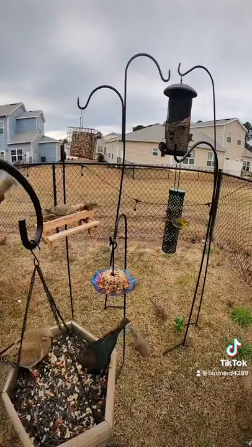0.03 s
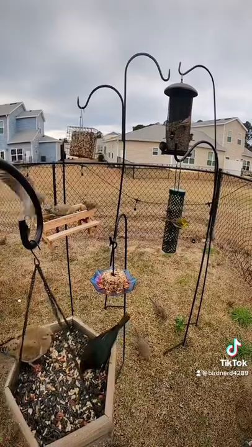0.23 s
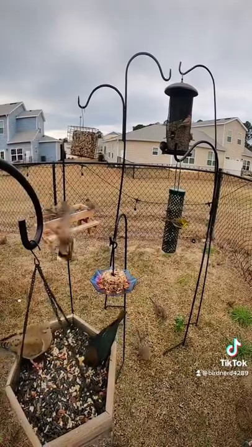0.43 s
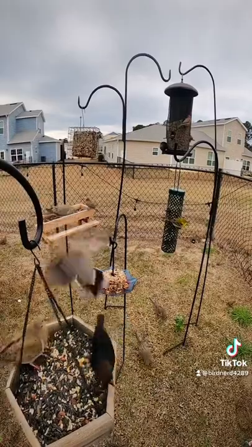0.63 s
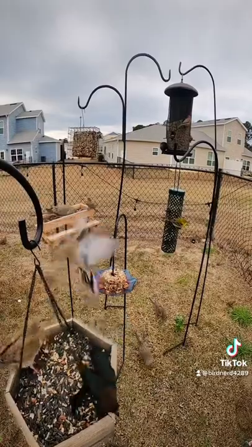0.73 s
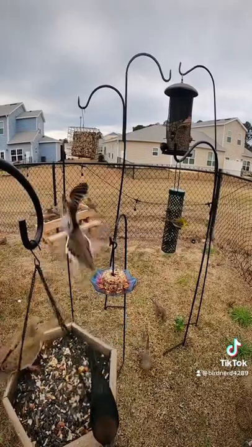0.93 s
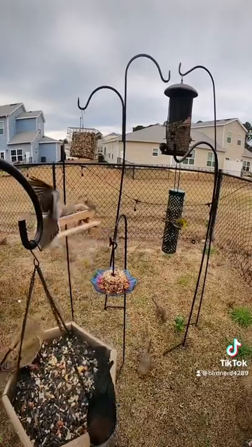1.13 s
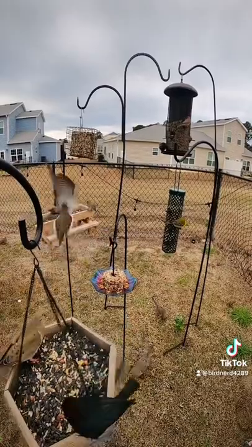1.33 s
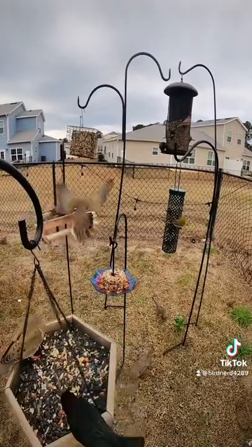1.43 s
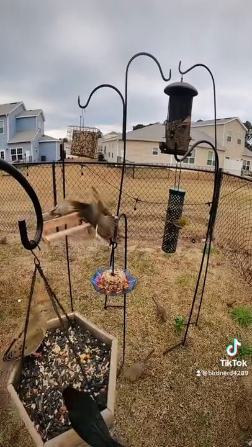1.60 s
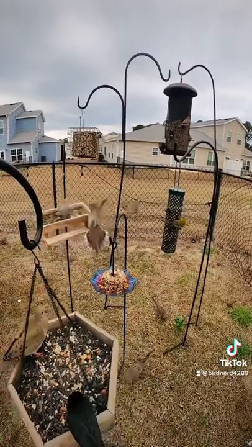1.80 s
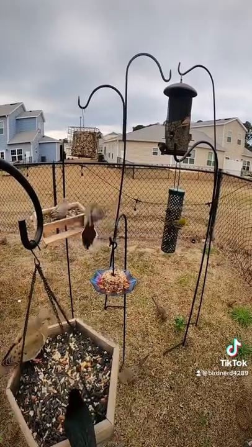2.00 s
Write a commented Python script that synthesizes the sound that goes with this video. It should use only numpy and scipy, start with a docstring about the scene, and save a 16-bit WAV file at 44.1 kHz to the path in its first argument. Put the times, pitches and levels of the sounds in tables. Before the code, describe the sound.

Close, dry, nearly mono wing flapping in a quiet garden: whistling wingbeats in bursts, strongest before the middle, then snapping wing tips, soft feather brushes, a bump, beak and claw ticks, and a faint chirp at either end.

```python
"""A garden feeder, close by, with doves fluttering round it in quiet outdoor air.
Each wingbeat whistles as gliding tones, swishes as shaped noise and pushes a puff of air as a pressure pulse;
then the wing tips clap three times and brush softly as a bird brakes to land, with hollow thumps.
Beaks and feet tick on the seed trays, which ring as resonant noise, and a small bird chirps twice."""
import sys
import numpy as np
from scipy import signal
from scipy.fft import rfft, irfft
from scipy.io import wavfile

SR = 44100
rng = np.random.default_rng(int(sys.argv[2]) if len(sys.argv) > 2 else 0)


def unload_audio(sound):
    """Save the sound as a 16-bit wav file, at the path given as the first command line argument."""
    columns = np.transpose(np.atleast_2d(sound))
    # keep every value between -1 and 1, then stretch to whole-number steps
    steps = np.round(np.clip(columns, -1, 1) * 32767)
    wavfile.write(sys.argv[1], SR, steps.astype(np.int16))


N = 90581
T = np.arange(N) / SR


def undb(db):
    """Level law: decibels to amplitude gain."""
    return 10 ** (np.asarray(db) / 20)


def unit(x):
    """Normalisation to an rms of 1."""
    return x / np.sqrt(np.mean(x ** 2))


def colour(x, points):
    """Linear filtering: gains from (frequency [Hz], gain [dB]) points, joined over log frequency."""
    hz, db = np.array(points).T
    f = np.maximum(np.fft.rfftfreq(N, 1 / SR), 1)
    gain = undb(np.interp(np.log(f), np.log(hz), db))
    return irfft(rfft(x) * gain, N)


def noise(points):
    """Broadband turbulence: random noise of rms 1 with the given spectrum."""
    return unit(colour(rng.standard_normal(N), points))


def band(hz, width_hz):
    """Resonance: noise of rms 1, width_hz wide at half amplitude; at 0 Hz, a random wander."""
    f = np.fft.rfftfreq(N, 1 / SR)
    response = 1 / (1 + (2 * (f - hz) / width_hz) ** 2)
    return unit(irfft(rfft(rng.standard_normal(N)) * response, N))


def swell(at, rise, fall):
    """Gaussian envelope: a rounded rise and fall about a moment."""
    return np.exp(-((T - at) / np.where(T < at, rise, fall)) ** 2)


def strike(at, rise, fall):
    """Exponential envelope: a pointed rise and decay about a moment."""
    return np.exp(-abs(T - at) / np.where(T < at, rise, fall))


def scatter(x, decay_s):
    """Diffuse reflection: convolution with a decaying noise tail of unit energy."""
    tail = rng.standard_normal(N) * np.exp(-T / decay_s)
    return signal.fftconvolve(x, tail / np.linalg.norm(tail))[:N]


# spectrum of the outdoor air: (frequency [Hz], relative density [dB])
AIR_SPECTRUM = [(130, 2), (450, -28), (1000, -22.5), (7000, -64.5), (9000, -33.5), (16000, -59)]


def outdoor_air():
    """Stationary noise: quiet air with most of its power in the bass."""
    return undb(-53) * noise(AIR_SPECTRUM)


# small bird's chirps: (peak time [s], rise [s], fall [s], top pitch before the voice ratio [Hz], level [dB])
CHIRPS = [(0.112, 0.01, 0.0038, 8030, -58.5), (1.967, 0.022, .025, 4540, -54)]
# two voices of a chirp: (pitch ratio [1], added level [dB])
CHIRP_VOICES = [(1.002, 3), (1.248, 1)]
# softening of the highest treble: (frequency [Hz], gain [dB])
CHIRP_TREBLE = [(8000, 0), (14000, -30)]
CHIRP_DROP, CHIRP_PEAK_S = .25, .0075  # share of pitch lost on the flanks; time scale of the peak
CHIRP_WAVER, CHIRP_OCTAVE_DB = .03, -9  # rms share of the pitch; octave against its fundamental


def chirps():
    """Frequency modulation: two voices with octaves flick up to a pointed peak and settle again."""
    out = 0
    for at, rise, fall, hz, db in CHIRPS:
        away = abs(T - at) / np.where(T < at, rise, fall)
        envelope = np.exp(-away ** 4)
        pitch = hz * (1 - CHIRP_DROP * (1 - np.exp(-abs(T - at) / CHIRP_PEAK_S)))
        for ratio, voice_db in CHIRP_VOICES:
            wavering = ratio * pitch * (1 + CHIRP_WAVER * band(0, 900))
            phase = 2 * np.pi * np.cumsum(wavering) / SR
            tone = np.sin(phase) + undb(CHIRP_OCTAVE_DB) * np.sin(2 * phase)
            out = out + undb(db + voice_db) * envelope * tone
    return colour(out, CHIRP_TREBLE)


# pecks and claws on the trays: (time [s], tick level [dB], ring level [dB])
PECKS = [(1.662, -57, -53.5), (1.713, -67, -50), (1.756, -45, -56), (1.764, -39, -61), (1.797, -46, -59),
         (1.843, -55, -66.5), (1.89, -52, -71), (1.996, -49, -50.5)]
# modes of the tray: (frequency [Hz], level against the ring [dB], decay by 60 dB [s])
TRAY_MODES = [(2530, -2, 0.056), (3770, -0.5, 0.06), (4070, 3.5, 0.036), (5750, 0.5, 0.026),
              (8830, -3, 0.018)]
# spectrum of a tick, also of a feather flick: (frequency [Hz], relative density [dB])
TICK_SPECTRUM = [(800, -10), (9500, 14), (16000, -14)]
TICK_S, RING_SCATTER = 0.0035, .045  # tick decay; half-width of a mode as a share of its frequency


def trays():
    """Impact excitation: sharp pecks rattle the seed and ring the damped modes of the tray."""
    out, tick = 0, noise(TICK_SPECTRUM)
    rings = [undb(db) * band(hz, 2 * RING_SCATTER * hz) for hz, db, _ in TRAY_MODES]
    for at, tick_db, ring_db in PECKS:
        out = out + undb(tick_db) * strike(at, 0.0004, TICK_S) * tick
        for ring, (_, _, t60) in zip(rings, TRAY_MODES):
            out = out + undb(ring_db) * ring * strike(at, 0.00064, t60 / np.log(1000))
    return out


# hollow thumps of the landing: (onset time [s], level [dB])
BUMPS = [(1.565, -43), (1.632, -31), (1.715, -50.5)]
BUMP_START_HZ, BUMP_END_HZ, BUMP_DROP_S = 1150, 200, .0024
BUMP_RISE_S, BUMP_FALL_S = .0018, .0045


def bumps():
    """Falling-frequency oscillation: hollow thumps whose pitch drops as they die away."""
    out = 0
    for at, db in BUMPS:
        age = np.maximum(T - at, 0)
        pitch = BUMP_END_HZ + (BUMP_START_HZ - BUMP_END_HZ) * np.exp(-age / BUMP_DROP_S)
        phase = 2 * np.pi * np.cumsum(pitch * (T > at)) / SR  # silent before the onset
        out = out + undb(db) * strike(at + BUMP_RISE_S, BUMP_RISE_S, BUMP_FALL_S) * np.sin(phase)
    return out


# puffs of air: (time [s], level [dB])
PUFFS = [(0.107, -28.5), (0.149, -29.5), (0.189, -31), (0.396, -39.5), (0.437, -38.5), (0.481, -31.5),
         (0.563, -25.5), (.652, -27), (0.729, -25.5), (0.775, -25.5), (0.852, -27.5), (0.988, -33.5),
         (1.094, -33), (1.202, -31), (1.549, -41), (1.625, -31.5), (1.698, -33)]
# spectrum of the eddies: (frequency [Hz], relative density [dB])
EDDY_SPECTRUM = [(15, -5), (40, 1), (75, -4.5), (170, -18.5), (2000, -124.5)]
# stirred air and rustle: (time [s], level of the bass [dB], level of the rustle [dB])
STIR = [(0, -41.5, -60), (.19, -42.5, -55.5), (.29, -40.5, -59), (.35, -73, -69), (0.38, -39, -51.5),
        (.69, -41.5, -60.5), (0.747, -27.5, -46), (.91, -39, -51.5), (1.03, -44, -61.5),
        (1.258, -43.5, -63.5), (1.40, -40, -55), (1.56, -36, -49), (1.72, -41, -51.5), (1.81, -51.5, -63),
        (2.05, -49, -60.5)]
# low rings of the feeder pole and tray: (frequency [Hz], width [Hz], level against the stirred air [dB])
POLE_RINGS = [(136.8, 12, -14), (247.4, 28, -22)]
PUFF_S, EDDY_S, EDDY_DB = 0.00536, 0.016, -6  # EDDY_DB is against the puff


def downwash():
    """Pressure pulse and turbulence: a dip between two pushes, with eddies; stirred air rings the feeder."""
    push, eddies = 0, 0
    for at, db in PUFFS:
        x = (T - at) / PUFF_S
        push = push + undb(db) * np.sqrt(2) * (x ** 2 - 1) * np.exp(-.5 * x ** 2)
        eddies = eddies + undb(db + EDDY_DB) * swell(at, EDDY_S, EDDY_S)
    at, bass_db, _ = np.array(STIR).T
    stir = undb(np.interp(T, at, bass_db))
    turbulence = np.hypot(eddies, stir) * noise(EDDY_SPECTRUM)  # the two add in power
    rings = stir * sum(undb(db) * band(hz, width) for hz, width, db in POLE_RINGS)
    return push + turbulence + rings


# spectrum of the plumage: (frequency [Hz], relative density [dB])
RUSTLE_SPECTRUM = [(250, 16), (600, 6), (1600, 6.5), (7000, -8), (9000, -8), (16000, -24)]
# feathers brushing and flicking: (time [s], level [dB], decay [s])
BRUSHES = [(0.078, -44, 0.0045), (0.74, -38.5, 0.0019), (0.751, -39.5, 0.0038), (.774, -36.5, 0.0012),
           (0.848, -44.5, 0.0037), (1.374, -39.5, 0.0035), (1.607, -39.5, 0.0058), (1.681, -43, 0.011),
           (1.713, -52.5, 0.032)]
# bright flicks of feather tips: (time [s], level [dB])
FLICKS = [(0.363, -51.5), (0.788, -49), (0.815, -43.5), (0.89, -48.5), (0.941, -45.5)]
# spectrum of a brush and of the wing tips' crack: (frequency [Hz], relative density [dB])
CRACK_SPECTRUM = [(400, -6.5), (1750, 5), (2900, -3), (5000, -4.5), (7500, -14.5), (9000, -8.5),
                  (12500, -17.5), (16000, -45)]
GRAIN_DB, GRAIN_HZ = 3.5, 213  # rms and rate of the rustle's roughness
FEATHER_RISE_S, FLICK_S = 0.00092, 0.0035


def feathers():
    """Friction noise: a grainy rustle of the plumage, with single brushes and bright flicks."""
    at, _, rustle_db = np.array(STIR).T
    grain_db = GRAIN_DB * band(0, 2 * GRAIN_HZ)
    rustle = undb(np.interp(T, at, rustle_db) + grain_db) * noise(RUSTLE_SPECTRUM)
    brushes = sum(undb(db) * strike(s, FEATHER_RISE_S, fall) for s, db, fall in BRUSHES)
    flicks = sum(undb(db) * strike(s, FEATHER_RISE_S, FLICK_S) for s, db in FLICKS)
    return rustle + brushes * noise(CRACK_SPECTRUM) + flicks * noise(TICK_SPECTRUM)


# wing-tip claps: (time [s], level of the crack [dB], level of the slap [dB])
CLAPS = [(1.381, -27.5, -38), (1.462, -29, -41), (1.5316, -21.5, -31.5)]
# spectrum of the slap: (frequency [Hz], relative density [dB])
SLAP_SPECTRUM = [(200, 4.5), (1800, 6), (9500, -11), (16000, -19)]
CRACK_RISE_S, CRACK_FALL_S = 0.0016, 0.0012
SLAP_LAG_S, SLAP_RISE_S, SLAP_FALL_S = 0.0053, 0.00097, 0.0039


def claps():
    """Impulsive noise: the wing tips meet with a crack and the vanes slap just after."""
    crack = sum(undb(db) * strike(at, CRACK_RISE_S, CRACK_FALL_S) for at, db, _ in CLAPS)
    slap = sum(undb(db) * strike(at + SLAP_LAG_S, SLAP_RISE_S, SLAP_FALL_S) for at, _, db in CLAPS)
    return crack * noise(CRACK_SPECTRUM) + slap * noise(SLAP_SPECTRUM)


# wingbeats: (middle time [s], whistle pitch [Hz], whistle level [dB], time scale of the fall [s], glide [Hz/s])
BEATS = [(.009, 2415, -39, 0.0095, -5000), (.089, 2607, -41.5, 0.0099, -2000),
         (0.161, 2520, -48, 0.0059, -7000), (0.249, 2320, -47, 0.0081, 7005),
         (0.38, 2504, -41, 0.0089, 11025), (0.462, 2535, -40.5, 0.0097, 2010),
         (0.549, 2257, -44.5, 0.0055, 4005), (0.638, 1850, -51, 0.01, -2000),
         (0.712, 3067, -36.5, 0.002, -9000), (.726, 2700, -34.5, 0.007, 3004),
         (0.795, 2647, -30.5, 0.0043, -3000), (0.826, 1523, -43.5, 0.0038, -12000),
         (0.86, 2560, -42, 0.0021, -30000), (0.88, 2387, -43, 0.0074, -6000),
         (0.969, 2404, -44, 0.013, 4001.5), (1.077, 2398, -44.5, 0.0086, 2991),
         (1.188, 2482, -41, 0.0082, 6990.5), (1.286, 2466, -41.5, 0.0053, -15000),
         (1.354, 2170, -46.5, 0.0054, 8000)]
# spectrum of the swish: (frequency [Hz], relative density [dB])
SWISH_SPECTRUM = [(700, -5.5), (1400, 8.5), (2200, 3.5), (3200, 4), (7000, -9), (9000, -2), (16000, -26)]
SWISH_LAG_S, SWISH_RISE_S, SWISH_FALL_S = 0.0017, 0.029, 0.041
SWISH_DB, SWISH_SHARE = -46, 0.29  # the swish grows by this share of the whistle's level in dB


def swishes():
    """Aerodynamic noise: air rushes over the wing on each beat, and overlapping beats add in power."""
    power = 0
    for at, _, db, _, _ in BEATS:
        envelope = swell(at + SWISH_LAG_S, SWISH_RISE_S, SWISH_FALL_S)
        power = power + (undb(SWISH_DB + SWISH_SHARE * db) * envelope) ** 2
    roughness = undb(3.94 * band(0, 280))
    return np.sqrt(power) * noise(SWISH_SPECTRUM) * roughness


# feathers that sing on each stroke: (pitch ratio [1], level to be divided by the slack [dB], lag [s])
VANES = [(1, 0, 0), (1.1, -4.5, .002), (.86, -5, .009), (.62, -7, -.006)]
# soft strokes hold their note less firmly: (whistle level [dB], slack from 0 to 1 [1])
SLACK = [(-54, .9), (-46, .45), (-33, .4)]
OCTAVE_DB, TWELFTH_DB = -15.5, -26  # overtones against the fundamental
ARCH_HZ, ARCH_S = 420, .02  # the arch lowers the pitch by ARCH_HZ at ARCH_S before and after mid-stroke
WAVER, WAVER_HZ, BREATH_HZ = .018, 230, 340  # rms share of the pitch, its rate, width of the airy edge
WHISTLE_SHAPE, WHISTLE_LEAD = 1.7, 1.25  # roundness of the swell; length of its rise against its fall


def whistles():
    """Aeolian tone: feathers sing in a tilted arch, clear on hard strokes, in breathy strands on soft ones."""
    out, airflow = 0, []
    for _ in VANES:
        waver = 1 + WAVER * band(0, 2 * WAVER_HZ)
        eddy = (band(0, BREATH_HZ) + 1j * band(0, BREATH_HZ)) / np.sqrt(2)
        airflow.append((waver, eddy))
    for at, hz, db, fall, glide in BEATS:
        age = np.clip(T - at, -2 * ARCH_S, 2 * ARCH_S)
        pitch = hz + glide * age - ARCH_HZ * (age / ARCH_S) ** 2
        slack = np.interp(db, *zip(*SLACK))
        for (waver, eddy), (ratio, vane_db, lag) in zip(airflow, VANES):
            # a steady part and a random part share the power; the random part blurs level and phase
            grip = np.sqrt(1 - slack ** 2) + slack * eddy
            phase = 2 * np.pi * np.cumsum(pitch * ratio * waver) / SR + np.angle(grip)
            overtones = undb(OCTAVE_DB) * np.sin(2 * phase) + undb(TWELFTH_DB) * np.sin(3 * phase)
            tone = abs(grip) * (np.sin(phase) + overtones)
            away = abs(T - at - lag) / np.where(T < at + lag, WHISTLE_LEAD * fall, fall)
            envelope = np.exp(-away ** WHISTLE_SHAPE)
            out = out + np.sqrt(2) * undb(db + vane_db / slack) * envelope * tone
    return out


# stereo width: (frequency [Hz], gain of the side signal [dB])
WIDTH = [(1500, -47.5), (9000, -22.5), (14000, 0.5)]
YARD_DB, YARD_S = -20, .028  # level against the birds; amplitude decay


def scene():
    """Superposition: near-mono birds and a faint short scatter from the yard; only the high noise is wide."""
    birds = whistles() + swishes() + feathers() + claps() + bumps() + trays() + chirps()
    yard = undb(YARD_DB) * scatter(birds, YARD_S)
    mid = birds + yard + downwash() + outdoor_air()
    side = colour(feathers() + claps() + trays(), WIDTH)  # fresh noise, so unlike the middle
    return np.array([mid + side, mid - side])


def record(dry):
    """Band limitation: a steep elliptic low-pass cuts the top above 15.8 kHz."""
    low_pass = signal.ellip(8, .2, 80, 15800, fs=SR, output="sos")  # order, ripple [dB], stop [dB], edge [Hz]
    return signal.sosfilt(low_pass, dry)


dry = scene()
out = record(dry)
unload_audio(out)
```